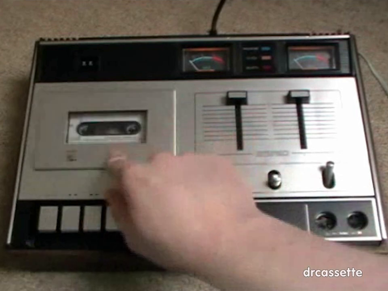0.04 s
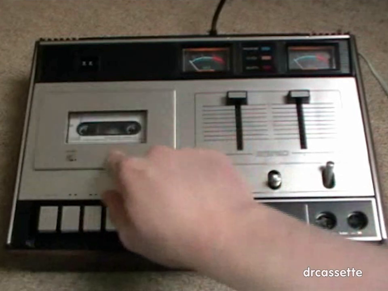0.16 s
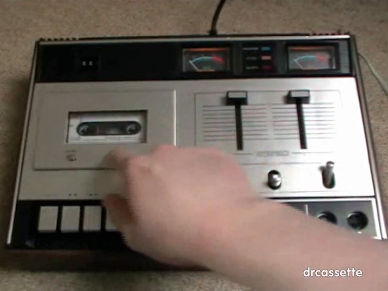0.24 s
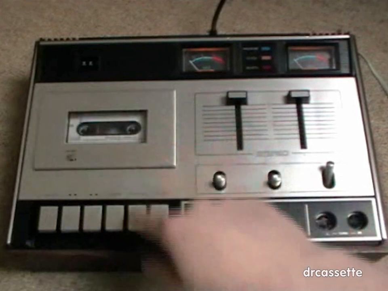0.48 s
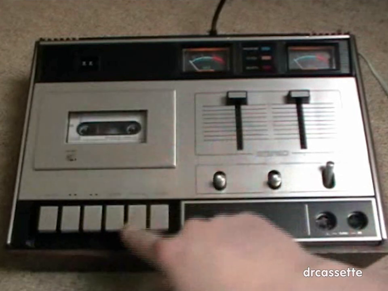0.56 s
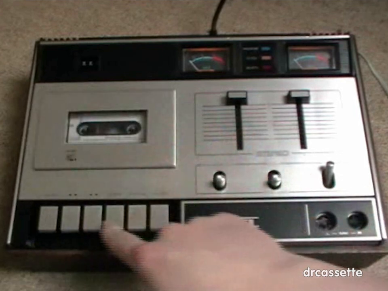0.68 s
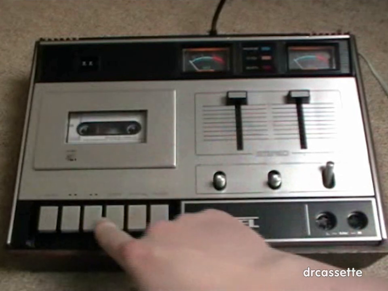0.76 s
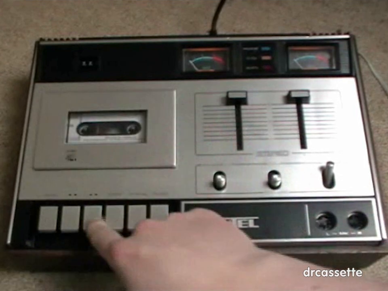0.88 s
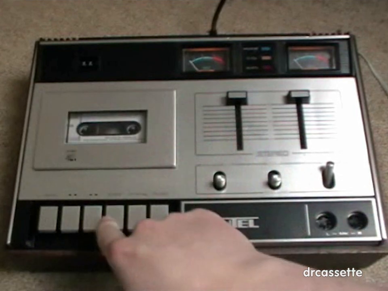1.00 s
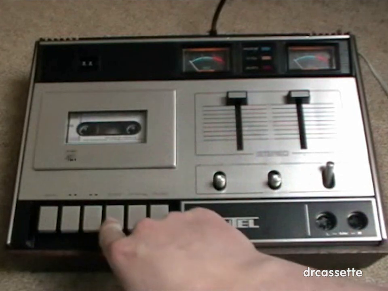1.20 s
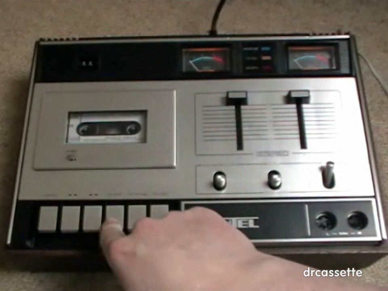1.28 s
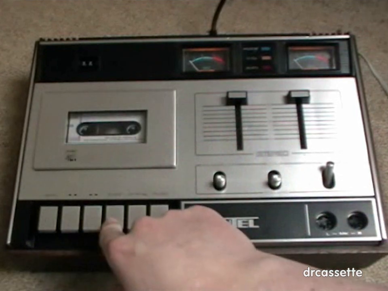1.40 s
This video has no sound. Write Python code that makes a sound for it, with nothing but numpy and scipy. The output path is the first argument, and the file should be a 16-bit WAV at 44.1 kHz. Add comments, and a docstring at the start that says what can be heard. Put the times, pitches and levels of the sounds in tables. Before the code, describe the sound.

A cassette deck key is pressed: light ticks lead into one sharp, ringing clack with a low thud, then a soft knock. Faint electrical buzz, motor hum and hiss lie underneath in a small room.

```python
"""A cassette deck's mechanism snaps in with a quick run of hard contacts and lands on the case, as a
finger presses its piano key in a small carpeted room. First the key's lever ticks and rubs as it takes
up its play; then the clack rings the steel frame and leaves a low boom, and the key knocks softly on
its stop. Mains buzz, a low motor tone and faint hiss lie underneath."""
import sys
import numpy as np
from scipy import signal
from scipy.fft import rfft, irfft, next_fast_len
from scipy.io import wavfile
from scipy.ndimage import uniform_filter1d

SR = 44100
rng = np.random.default_rng(int(sys.argv[2]) if len(sys.argv) > 2 else 0)


def master_out(mix):
    """Clip the mix to full scale and print it as 16-bit PCM to the path in sys.argv[1]."""
    frames = np.transpose(np.atleast_2d(mix))
    ceiling = np.clip(frames, -1, 1)
    pcm = np.round(ceiling * 32767).astype(np.int16)
    wavfile.write(sys.argv[1], SR, pcm)


N = 63945
TIME = np.arange(N) / SR
PUSH_S, SNAP_S, LAND_S = .245, .2527, .2840  # the deck gives, the mechanism snaps in, then lands
ATTACK_S, MAINS_HZ = .00037, 50


def amp(db):
    """Decibels to gain."""
    return 10 ** (np.asarray(db) / 20)

def unit(x):
    """Scale to rms 1."""
    return x / np.sqrt(np.mean(x ** 2) + 1e-20)

def along(points, hz):
    """Read (Hz, value) points on a log axis."""
    f, v = np.transpose(points)
    return np.interp(np.log(hz + 1), np.log(f + 1), v)

def fade(t, t60):
    """A decay that falls 60 dB in t60 seconds."""
    return np.exp(-np.log(1000) * t / t60)

def rise(seconds):
    """An attack with this time constant."""
    return 1 - np.exp(-TIME / seconds)

def filtered(x, response):
    """Filter x by a gain given as a function of Hz."""
    size = next_fast_len(N + SR // 2)
    return irfft(rfft(x, size) * response(np.fft.rfftfreq(size, 1 / SR)), size)[..., :N]

def coloured(x, points):
    """EQ x with a (Hz, dB) curve."""
    return filtered(x, lambda hz: amp(along(points, hz)))

def pass_filter(x, kind, hz, order):
    """A low-pass or high-pass filter."""
    return signal.sosfilt(signal.butter(order, hz, kind, fs=SR, output="sos"), x)

def noise(spectrum):
    """Noise of rms 1 with the given spectrum."""
    return unit(coloured(rng.standard_normal(N), spectrum))

def spread(mid, side, width):
    """Left and right from a centre and a side signal."""
    side = coloured(side, width)
    return np.array([mid + side, mid - side])

def add(track, start_s, sound):
    """Mix a sound in at its cue."""
    start = round(start_s * SR)
    track[start:] += sound[:N - start]

def ring(modes, scatter_db=1.5):
    """Damped modes, balanced a little differently at every blow."""
    tones = np.zeros(N)
    for hz, db, t60 in modes:
        gain = amp(db + scatter_db * rng.standard_normal())
        tones += gain * fade(TIME, t60) * np.sin(2 * np.pi * hz * TIME)
    return tones * rise(ATTACK_S)

def burst(spectrum, t60):
    """The dense, quickly dying modes of a contact, played as noise."""
    return noise(spectrum) * fade(TIME, t60) * rise(ATTACK_S)


# Colours of the hiss and the rustle. Each row: frequency in Hz, relative level in dB.
HISS_COLOUR = [(15, -49.5), (25, -18.5), (192, -4), (500, -11), (954, -13.5), (1270, -15.5), (1410, -16),
               (2070, -14), (2420, -21.5), (3660, -14), (12000, -24), (15600, -63), (22000, -120)]
RUSTLE_COLOUR = [(60, -17.5), (250, -1), (580, 6.5), (1100, -12), (1900, -2.5), (2800, -22), (9000, -38.5)]
# Stereo width of the background bed. Each row: frequency in Hz, side level in dB.
BED_WIDTH = [(60, -5.5), (250, 1), (700, 3), (2500, 0.5), (3600, -0.5), (5000, -37.5)]

def air(rustle_s=.65, width_s=.094):
    """Steady hiss, and a faint rustle that swells and fades after the clack."""
    swell = amp(-62.5) * np.exp(-.5 * ((TIME - rustle_s) / width_s) ** 2)
    mid, side = [amp(-66.5) * noise(HISS_COLOUR) + swell * noise(RUSTLE_COLOUR) for _ in range(2)]
    return spread(mid, side, BED_WIDTH)

# Tone curve of the buzz. Each row: frequency in Hz, relative level in dB.
BUZZ_COLOUR = [(50, -20.5), (100, 1.5), (150, -2), (200, -10), (250, -3.5), (320, -13), (600, -13),
               (800, -6.5), (950, -8), (1150, -9), (1250, -9.5), (1400, -24), (1600, -12), (1780, -10.5),
               (1900, -17.5), (2100, -14), (2450, -28), (2800, -15), (3300, -14.5), (4500, -19),
               (10000, -32.5)]

def mains_buzz():
    """A stack of mains harmonics at random phases, looped one cycle at a time."""
    hz = MAINS_HZ * np.arange(1, 150)
    phases = 2 * np.pi * rng.random((2, len(hz)))
    gains = amp(along(BUZZ_COLOUR, hz))
    angles = 2 * np.pi * hz[:, None] * TIME[:round(SR / MAINS_HZ)]
    cycles = [gains @ np.cos(angles + phase[:, None]) for phase in phases]
    mid, side = [unit(np.resize(cycle, N)) for cycle in cycles]
    return amp(-65.5) * spread(mid, side, BED_WIDTH)

# Chassis resonances. Each row: pitch in Hz, relative level in dB, t60 in seconds.
CHASSIS_MODES = [(2090, 0, .024), (3700, 0, .015), (950, -10, .035)]

def chassis_buzz(delay_s=.0135):
    """Each mains cycle rings the chassis once."""
    pulses = np.diff(np.floor((TIME - delay_s) * MAINS_HZ), prepend=-1)
    ping = ring(CHASSIS_MODES) * rise(.003)
    return amp(-70.5) * unit(signal.fftconvolve(pulses, ping)[:N])

def motor(hz=191.7, fade_in_s=.2):
    """The motor's low tone fades in once the key is down."""
    fade_in = np.clip((TIME - LAND_S) / fade_in_s, 0, 1)
    return amp(-69.5) * unit(np.sin(2 * np.pi * hz * TIME)) * fade_in

# Decay of the carpeted room. Each row: frequency in Hz, t60 in seconds.
ROOM_DECAY = [(100, 0.23), (330, 0.44), (700, .31), (1400, 0.26), (2500, .25), (4000, 0.28), (11000, .23)]
# EQ of the reverb, then the extra EQ on its side signal. Each row: frequency in Hz, gain in dB.
ROOM_EQ = [(60, -18), (160, -2), (240, -3.5), (360, 1), (600, -1), (850, 2.5), (1400, -3.5), (2400, -0.5),
           (6000, 4), (11000, -1)]
ROOM_SIDE_EQ = [(100, -3), (350, -8), (700, -1), (2200, 1), (3300, -3), (4000, -50)]

def room(x):
    """A short diffuse tail in which each frequency dies at its own speed."""
    hz, t, spectra = signal.stft(rng.standard_normal((2, N)), SR, nperseg=256)
    spectra *= fade(t, along(ROOM_DECAY, hz)[:, None])
    tails = signal.istft(spectra, SR, nperseg=256)[1][:, :N] * rise(.005)
    mid, side = [signal.fftconvolve(x, tail / np.linalg.norm(tail))[:N] for tail in tails]
    return spread(coloured(mid, ROOM_EQ), coloured(side, ROOM_EQ), ROOM_SIDE_EQ)

# The steel frame's ring and the low boom. Each row: pitch in Hz, level in dB, t60 in seconds.
FRAME_MODES = [(1380, -4, .2), (1740, -10, .2), (2208, -6, .2), (2763, -4, .15), (3050, -9, .17),
               (3515, -10, .19), (3600, -9, .13), (4475, -10, .14), (4782, -10, .16), (5694, -12, .18),
               (9058, -8, .13)]
BOOM_MODES = [(172, -4, .18), (282, -6, .2), (318, -1, .26), (350, -4, .26), (383, 0, .34), (540, -7, .22),
              (608, -9, .22)]

def deck_body(push_hz=70):
    """The whole deck gives on its feet, the snap rings its frame and the landing leaves a low boom."""
    out = np.zeros(N)
    add(out, PUSH_S, amp(-49) * fade(TIME, t60=.048) * np.sin(2 * np.pi * push_hz * TIME))
    add(out, SNAP_S, amp(-19) * ring(FRAME_MODES))
    add(out, LAND_S, amp(-28.5) * ring(BOOM_MODES) * rise(.025))
    return out

# Colour of the puff. Each row: frequency in Hz, relative level in dB.
PUFF_COLOUR = [(30, -24), (120, -16), (250, -3), (600, -1), (850, 0), (1500, -5.5), (4000, -25.5),
               (10000, -39)]

def puff():
    """The dull, breathy part of a contact."""
    return burst(PUFF_COLOUR, t60=.04)

# Colour of the crack. Each row: frequency in Hz, relative level in dB.
CRACK_COLOUR = [(100, -25.5), (400, -11.5), (900, -7.5), (1700, 0.5), (2700, -0.5), (3700, 1.5),
                (6000, -3.5), (8500, -4), (10500, -8.5), (12000, -14.5)]

def crack():
    """The bright snap of a hard contact."""
    return burst(CRACK_COLOUR, t60=.024)

# Modes of the key's stop. Each row: pitch in Hz, level in dB, t60 in seconds.
STOP_MODES = [(234, 0, .055), (330, -16, .05), (689, -13, .035), (888, -19, .03), (1390, -22, .02),
              (1910, -27, .02)]
# Soft knocks. Each row: start in seconds, level in dB, puff relative to ring in dB.
STOP_KNOCKS = [(0.459, -47, -1), (.4657, -36, -3), (.470, -29, -14), (1.417, -63, -5)]

def key_knocks():
    """The key knocks softly against its stop."""
    out = np.zeros(N)
    for start_s, db, puff_db in STOP_KNOCKS:
        add(out, start_s, amp(db) * (ring(STOP_MODES) + amp(puff_db) * puff()))
    return out

# Modes of the key's lever. Each row: pitch in Hz, level in dB, t60 in seconds.
LEVER_MODES = [(720, -17, .025), (1150, -18, .03), (1310, -9, .035), (1405, -2, .04), (1550, -6, .035),
               (1748, -12, 0.028), (2780, -9, .024)]

def lever(detune=.018):
    """The lever's short, narrow ring; its pitch shifts with the pressure of each contact."""
    stretch = 1 + detune * rng.standard_normal()
    modes = [(hz * stretch, db, t60) for hz, db, t60 in LEVER_MODES]
    return pass_filter(ring(modes), "high", hz=750.4, order=2)

# Colour of the sliding lever. Each row: frequency in Hz, relative level in dB.
RUB_COLOUR = [(60, -40.5), (200, -18), (700, -20), (950, -24), (1100, -13), (1220, -13), (1330, 2.5),
              (1420, -4), (1560, -13), (1750, -24), (2500, -33), (9000, -38.5)]
# Light ticks. Each row: start in seconds, then lever ring, crack and puff levels in dB.
LEVER_TICKS = [(.1262, -32.5, -70, -60), (.1325, -41, -47.5, -49), (0.165, -43, -72, -66),
               (0.18, -41, -72, -66), (.186, -43, -72, -66), (0.219, -44.5, -65.5, -64),
               (0.2409, -35, -48, -56)]

def key_press(rub_from_s=.15, rub_to_s=.244):
    """The lever rubs and ticks on its way down; a fingertip's push leaves out its upper modes."""
    sliding = 1. * ((TIME > rub_from_s) & (TIME < rub_to_s))
    out = amp(-53) * noise(RUB_COLOUR) * uniform_filter1d(sliding, size=256)
    for start_s, lever_db, crack_db, puff_db in LEVER_TICKS:
        soft_ring = pass_filter(lever(), "low", hz=1550, order=4)
        add(out, start_s, amp(lever_db) * soft_ring + amp(crack_db) * crack() + amp(puff_db) * puff())
    return out

# Modes of the case. Each row: pitch in Hz, level in dB, t60 in seconds.
CASE_MODES = [(185, -14, .04), (228, -5.5, .035), (272, -6.5, 0.045), (550, -7.5, 0.051), (617, -11.5, .03),
              (790, -14, .04)]
# The hits of the clack. Each row: start in seconds, then lever ring, crack and thud levels in dB.
HARD_CONTACTS = [(.2440, -10, -17, -33.5), (0.2484, -0.5, -10, -30), (0.2518, -14.5, -4.5, -32),
                 (0.2551, -4.5, -14.5, -35), (0.2615, -15.5, -20, -36.5), (0.2696, -11, -13, -21.5),
                 (0.2762, -9, -8, -30), (0.281, -17.5, -7.5, -11), (.2840, -22.5, -12.5, -11),
                 (0.2882, -20.5, -19.5, -30.5)]

def mechanism():
    """Each hard contact rings the lever, cracks and thuds the case in its own proportion."""
    out = np.zeros(N)
    for start_s, lever_db, crack_db, thud_db in HARD_CONTACTS:
        thud = ring(CASE_MODES) + amp(-7.5) * puff()
        add(out, start_s, amp(lever_db) * lever() + amp(crack_db) * crack() + amp(thud_db) * thud)
    return out

# Pan of the deck and its reverb. Each row: frequency in Hz, left over right in dB.
PAN_CURVE = [(60, 3), (200, -1), (360, -1.5), (700, 1), (1800, 1.5), (3800, -.3), (5000, 0)]

def scene():
    """Low-cut ticks, clack and knocks in the room, with the body's ring and boom, over the bed."""
    hits = pass_filter(key_press() + key_knocks() + mechanism(), "high", hz=150, order=4)
    deck = hits + deck_body() + amp(-11) * room(hits)
    panned = filtered(deck, lambda hz: amp(along(PAN_CURVE, hz) * np.array([[.5], [-.5]])))
    return panned + mains_buzz() + chassis_buzz() + motor() + air()

def record(dry):
    """A soft clip rounds off the highest peaks, and a steep low-pass trims the top."""
    ceiling, top_hz = .9, 12300
    rounded = dry / (1 + np.abs(dry / ceiling) ** 6) ** (1 / 6)
    return filtered(rounded, lambda hz: 1 / np.sqrt(1 + (hz / top_hz) ** 160))


dry = scene()
out = record(dry)
master_out(out)
```